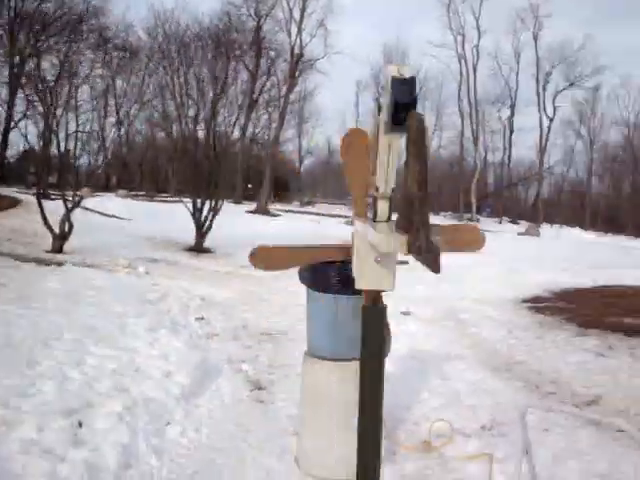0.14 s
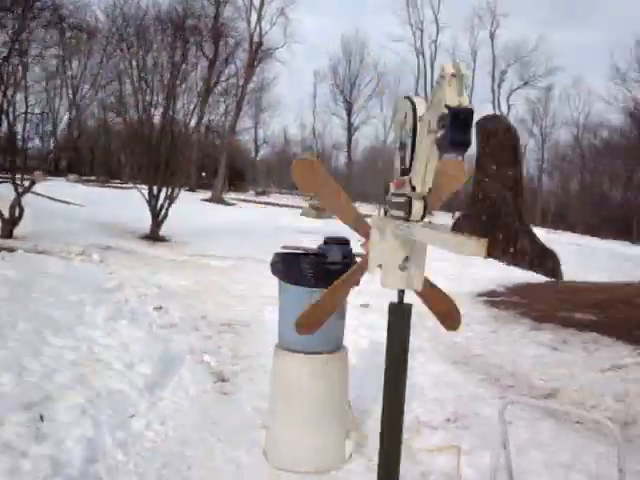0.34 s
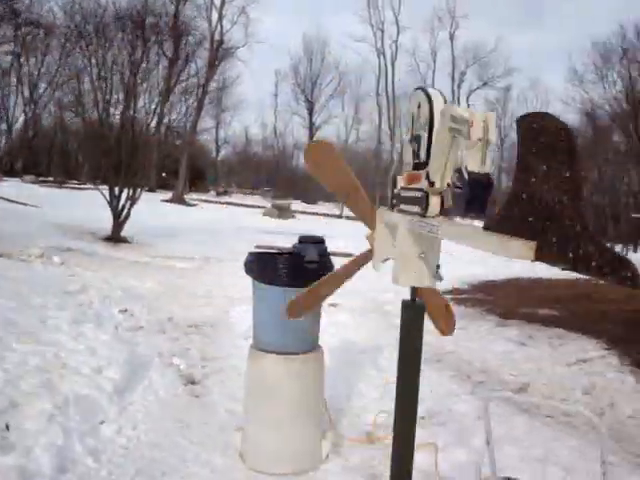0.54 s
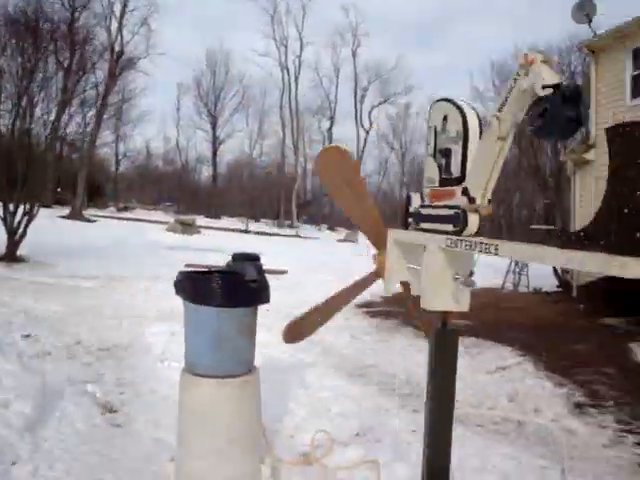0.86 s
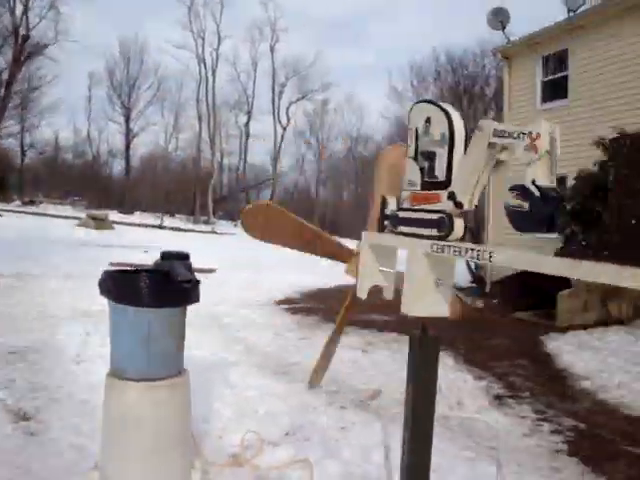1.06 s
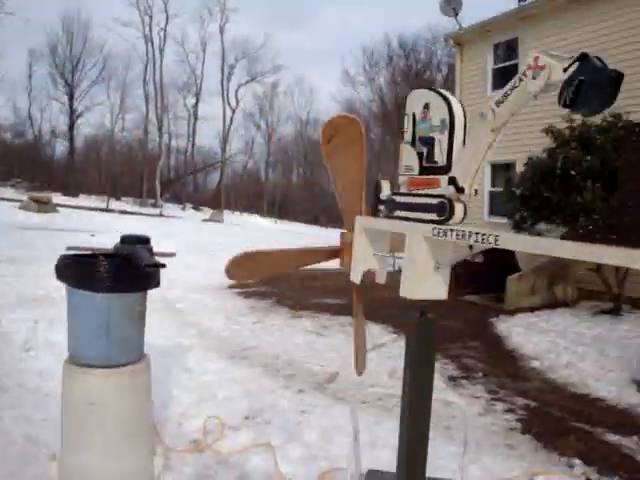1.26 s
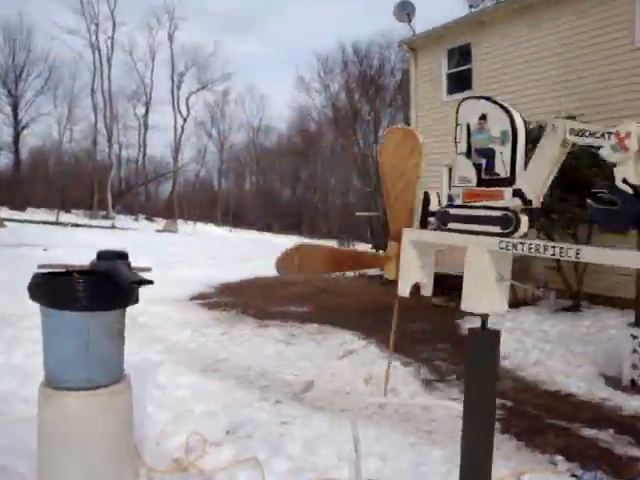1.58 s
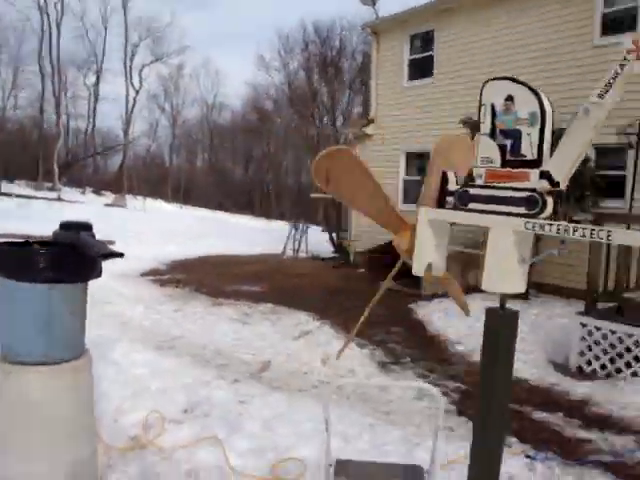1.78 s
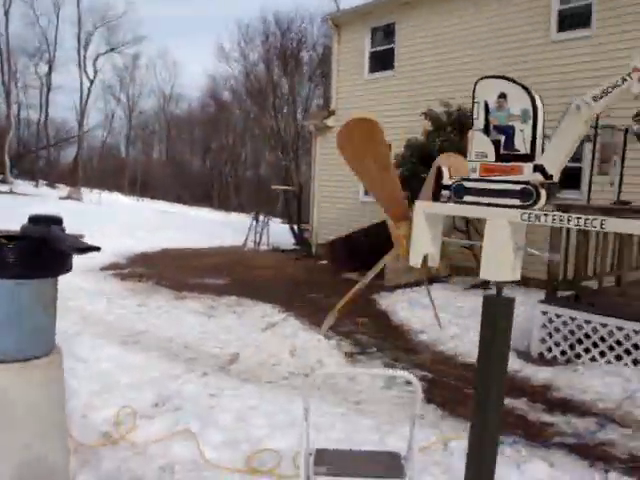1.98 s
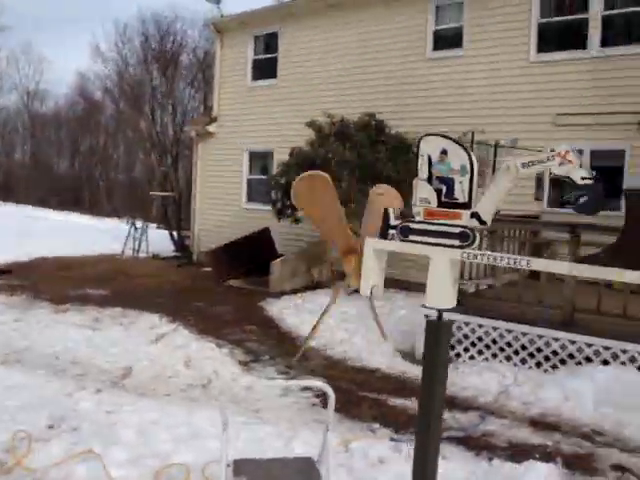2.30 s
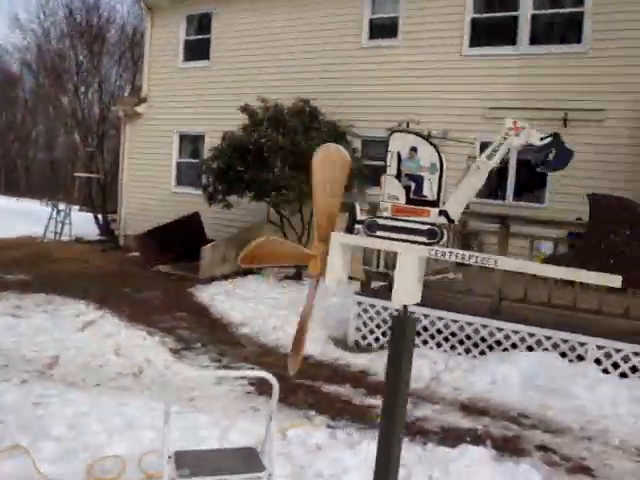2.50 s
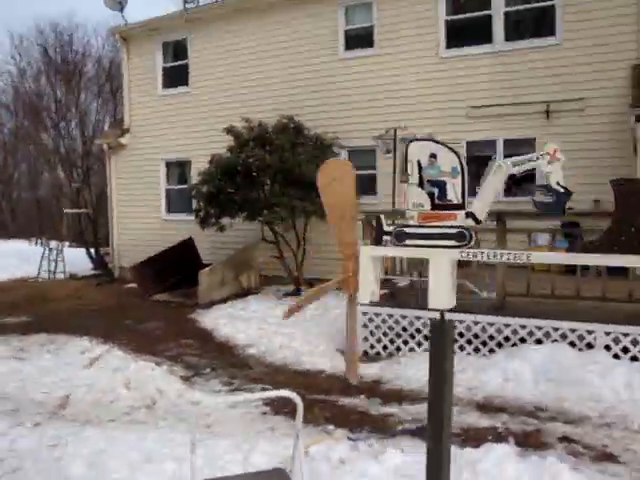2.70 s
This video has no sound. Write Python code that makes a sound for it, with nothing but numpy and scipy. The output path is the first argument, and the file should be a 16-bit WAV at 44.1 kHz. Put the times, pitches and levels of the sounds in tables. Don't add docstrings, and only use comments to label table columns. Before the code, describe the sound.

Steady high blower whine and rushing air outdoors, broken in the first half by harsh wind buffeting

```python
import sys
import numpy as np
from scipy import signal
from scipy.fft import rfft, irfft, next_fast_len
from scipy.io import wavfile
from scipy.ndimage import uniform_filter1d, map_coordinates

SR = 44100
rng = np.random.default_rng(int(sys.argv[2]) if len(sys.argv) > 2 else 0)


def voltage_ratio(decibels):
    exponent = np.asarray(decibels, float) / 20
    return 10 ** exponent


def master_out(mix):
    frames = np.transpose(np.atleast_2d(mix))
    ceiling = np.clip(frames, -1, 1)
    pcm = np.round(ceiling * 32767).astype(np.int16)
    wavfile.write(sys.argv[1], SR, pcm)


N = 125685


def unit(x):
    return x / np.sqrt(np.mean(x ** 2) + 1e-20)


def along(points, hz):
    f, v = np.transpose(points)
    return np.interp(np.log(hz + 1), np.log(f + 1), v)


def curves(rows):
    times, *columns = np.transpose(rows)
    return [np.interp(np.arange(N) / SR, times, column) for column in columns]


def wobble(rate):
    knots = np.minimum(np.arange(N) * rate / SR, 3990)
    return map_coordinates(rng.standard_normal(4000), [knots])


def filtered(x, response):
    m = next_fast_len(N + SR // 2)
    return irfft(rfft(x, m) * response(np.fft.rfftfreq(m, 1 / SR)), m)[..., :N]


def coloured(spectrum, envelope=1):
    noise = envelope * rng.standard_normal(N)
    return unit(filtered(noise, lambda hz: voltage_ratio(along(spectrum, hz))))


# (frequency [Hz], level [dB])
DARK_TURBULENCE = [(30, -51), (80, -29), (150, -7.5), (280, 4.5), (500, 0), (1000, -5), (2500, -52),
                   (6000, -84.5)]
BRIGHT_TURBULENCE = [(60, -29), (200, -11), (500, 2), (900, -1.5), (1600, -8.5), (3000, -23), (6000, -41),
                     (15000, -68.5)]


def turbulence():
    lumps_per_s, lump_db = 300, 4
    dark = coloured(DARK_TURBULENCE, voltage_ratio(lump_db * wobble(lumps_per_s)))
    bright = coloured(BRIGHT_TURBULENCE, voltage_ratio(lump_db * wobble(lumps_per_s)))
    return dark, bright


# (time [s], level [dB])
DRAUGHT_LEVEL = [(0, -41), (.06, -33.5), (.3, -34.5), (.9, -27.5), (1.09, -41), (1.13, -47.5), (1.35, -42),
                 (1.5, -73)]
# (frequency [Hz], level [dB])
RUMBLE_SPECTRUM = [(20, -13.5), (60, -12), (130, 1), (220, -4), (400, -33)]
RUMBLE_DB = -12


def draught(dark):
    level_db = curves(DRAUGHT_LEVEL)[0]
    flow = voltage_ratio(level_db + 1.17 * wobble(35.13)) * dark
    eddies = voltage_ratio(level_db + RUMBLE_DB + 1.7 * wobble(15)) * coloured(RUMBLE_SPECTRUM)
    return flow + eddies


# (time [s], length [s], level [dB], brightness [0-1])
PUFF_EVENTS = [(0.061, 0.036, -31.5, 1), (0.152, 0.019, -26, .2), (.207, 0.041, -21.5, 0.1),
               (.257, 0.016, -11.5, 0.9), (0.275, 0.036, -17, 0.5), (0.315, 0.022, -14.5, 1),
               (.364, .022, -24, 0.3), (0.418, 0.034, -39, 0.4), (0.501, 0.025, -17.5, 1),
               (0.526, 0.011, -27, 0), (0.54, .023, -12.5, 0.9), (0.566, 0.02, -18.5, 0.2),
               (0.593, 0.0035, -19, 0.7), (0.61, .016, -25.5, 0.1), (0.668, .008, -22.5, 0.4),
               (0.683, 0.016, -16.5, 0.8), (0.701, 0.0224, -18.5, 0.3), (0.728, 0.018, -49, 0.1),
               (0.818, 0.0093, -17, 0.6), (0.827, 0.029, -21.5, 0.5), (.858, .008, -11, 0.8),
               (0.885, 0.0047, -11, 0.97), (0.9, 0.024, -40, 0), (0.946, 0.0084, -33, 0.4),
               (0.984, 0.0047, -34, 0.8), (1.029, 0.027, -33, 0), (1.078, 0.02, -29.5, 0),
               (1.224, .013, -23, 0.2), (1.266, .025, -21.5, 0.6), (1.339, 0.0072, -27.5, 0.1)]
EDGE_S = 0.0017


def puffs(dark, bright):
    t, out = np.arange(N) / SR, np.zeros(N)
    for start, length, db, share in PUFF_EVENTS:
        inside = np.minimum(t - start + EDGE_S, start + length + EDGE_S - t)
        gate = np.clip(inside / (2 * EDGE_S), 0, 1) ** 2
        puff = gate * (np.sqrt(1 - share) * dark + np.sqrt(share) * bright)
        to_level = np.sqrt(np.sum(gate ** 2) / (np.sum(puff ** 2) + 1e-20) + 1e-20)
        out = out + voltage_ratio(db) * puff * to_level
    return out


# (time [s], length [s], level [dB])
RUSTLE_EVENTS = [
    (0.325, 0.0099, -31),
    (0.835, 0.016, -33),
    (1.1, 0.036, -38),
]


def grip_rustle():
    t = np.arange(N) / SR
    hiss = coloured([(5500, -32.5), (6500, 6), (10000, -12)])
    return hiss * sum(voltage_ratio(db) * ((t > s) & (t < s + length)) for s, length, db in RUSTLE_EVENTS)


# (time [s], peak level [dB], width [ms], direction [+1 or -1])
SLAPS = [(.2665, -3, .1, -1), (.291, -6, .22, -1), (.331, -6, .12, -1), (.369, -9, .2, -1),
         (.5058, -2, .24, -1), (.5418, -6, .14, -1), (.5475, -5, .07, 1), (.5585, -9, .06, 1),
         (.5607, -3, .13, -1), (.592, -7, .17, -1), (.6862, -4, .08, 1), (.715, -6, .15, -1),
         (.834, -5, .055, -1), (.839, -2, .13, 1), (.8613, -4, .12, 1), (.8865, -2, .09, -1),
         (1.282, -11, .16, 1)]
REBOUND = 3.5
SLAP_LOW_HZ = 170
DIP_S = 0.0014


def membrane_slaps():
    t, out = np.arange(N) / SR, np.zeros(N)
    for s, db, ms, way in SLAPS:
        u = np.abs(t - s) / (ms / 1000)
        dent = (1 + u) * np.exp(-u)
        recoil = (1 + u / REBOUND) * np.exp(-u / REBOUND) / REBOUND
        out = out + way * voltage_ratio(db) * (dent - recoil) * 1.3
    return filtered(out, lambda hz: hz ** 2 / (hz ** 2 + SLAP_LOW_HZ ** 2))


def wind_dips():
    t = np.arange(N) / SR
    return np.prod([1 - np.exp(-((t - s) / DIP_S) ** 2) for s, *_ in SLAPS], axis=0)


TURN_HZ, SHELF_OCTAVES = 3240, 0.77
NEAR_HZ, NEAR_DB = 1280, 4


def rush(spectrum, patchy_db, turn_db):
    hz, t, z = signal.stft(coloured(spectrum), SR, nperseg=512)
    patches = uniform_filter1d(rng.standard_normal(z.shape), 6, 0)
    patches = unit(uniform_filter1d(patches, 10, 1))
    turn = np.interp(t, np.arange(N) / SR, turn_db)
    shelf = np.clip(np.log2((hz + 1) / TURN_HZ), 0, SHELF_OCTAVES)
    cavity = NEAR_DB / 10 * np.exp(-((hz - NEAR_HZ) / 300) ** 2)
    gain_db = patchy_db * patches + (shelf - cavity)[:, None] * turn
    return signal.istft(z * voltage_ratio(gain_db), SR, nperseg=512)[1][:N]


# (frequency [Hz], level per hertz [dB])
ROAR_SPECTRUM = [(35, -66), (60, -43), (278, -22.5), (481, -7), (606, -2.5), (701, -7), (991, 1.5),
                 (1550, -5), (1900, -6), (2470, -30), (4180, -120)]
# (frequency [Hz], level per hertz [dB])
HISS_SPECTRUM = [(1000, -62), (2100, -7.5), (2750, -9), (3400, -14.5), (3900, -13), (4700, -17.5),
                 (6400, -18.5), (10100, -30.5)]
ROAR_DB, HISS_DB = -26, -21
ROAR_FOLLOWS = 0.53


def air_rush(air_db, turn_db):
    roar = voltage_ratio(ROAR_DB + ROAR_FOLLOWS * air_db) * rush(ROAR_SPECTRUM, 0.89, turn_db)
    hiss = voltage_ratio(HISS_DB + air_db + 0.36 * wobble(5.17)) * rush(HISS_SPECTRUM, 0.84, turn_db)
    return roar + hiss


BLADES = 35
# (time [s], blade-passing frequency [Hz])
BLADE_PITCH = [(0, 2107.8), (.25, 2109.2), (.8, 2110.4), (1.5, 2110), (1.85, 2109.2), (2.05, 2108),
               (2.35, 2107.3), (2.58, 2110.2), (2.85, 2108.8)]
# (blade multiple, level re whine [dB], flutter [dB])
BLADE_HARMONICS = [(1, 0, .35), (2, -17.5, 1.3), (3, -22, 2), (4, -38, 3)]
# (offset from the multiple [shaft orders], blade multiple, level re whine [dB])
SHAFT_SIDEBANDS = [(-1, 1, -23), (1, 1, -22.5), (-1, 3, -35), (1, 3, -34), (-7, 1, -29)]
# (shaft order, level re whine [dB])
SHAFT_ORDERS = [(3, -50.5), (5, -43.5), (6, -50), (7, -37), (8, -32), (10, -31.5)]


def whine(level_db, turn_db):
    pitch = curves(BLADE_PITCH)[0] + 0.4 * wobble(6)
    shaft_angle = 2 * np.pi * np.cumsum(pitch) / SR / BLADES

    def tone(order, db, flutter):
        phase = rng.uniform(0, 2 * np.pi)
        return voltage_ratio(db + flutter * wobble(28.02)) * np.sin(order * shaft_angle + phase)

    lines = np.zeros(N)
    for k, db, flutter in BLADE_HARMONICS:
        lines += tone(k * BLADES, db + 0.6 * (k > 2) * turn_db, flutter)
    for offset, k, db in SHAFT_SIDEBANDS:
        lines += tone(k * BLADES + offset, db, 2.2)
    for order, db in SHAFT_ORDERS:
        lines += tone(order, db, 3.1)
    return np.sqrt(2) * voltage_ratio(level_db) * lines


# (time [s], whine level [dB], air rush gain [dB], treble turn [dB])
WALK_ROUND = [(0, -17, -1.5, -7), (.2, -20, -1, -12), (.262, -21.5, -10.5, -1.5),
              (.272, -27.5, -10.5, -14.5), (.45, -25.5, -10, -5), (.56, -31, -14.5, -1.5),
              (.68, -30, -11.5, -4.5), (.76, -26.5, -13.5, -2.5), (.89, -27.5, -8.5, -5),
              (.97, -23, -8.5, -0.5), (1.1, -23.5, -4, 0), (1.31, -18.5, -3, 1.5), (1.55, -18.5, -1, 0.5),
              (1.85, -17, -1, -2), (2.3, -16.5, -2, -1), (2.6, -15.5, -2, 0), (2.85, -17.5, -2.5, 1.5)]


def blower():
    level_db, air_db, turn_db = curves(WALK_ROUND)
    return whine(level_db, turn_db) + air_rush(air_db, turn_db)


def scene():
    dark, bright = turbulence()
    wind = draught(dark) + puffs(dark, bright)
    return (wind_dips() * wind + grip_rustle() + membrane_slaps() + blower())[None]


TOP_HZ = 10010
HOLE_HZ, HOLE_SHARE, HOLE_LOAD = 4500, 0.03, 2.5


def treble_holes(x):
    hz, t, z = signal.stft(x, SR, nperseg=512)
    load = np.sqrt(np.sum(np.abs(z[0, 2:10]) ** 2, 0))
    cells = rng.random((len(hz) // 5 + 1, len(t) // 2 + 1))
    cells = cells.repeat(5, 0).repeat(2, 1)[:len(hz), :len(t)]
    treble = (hz[:, None] / TOP_HZ) ** 2 * (hz[:, None] > HOLE_HZ)
    odds = (HOLE_SHARE + HOLE_LOAD * uniform_filter1d(load, 5)) * treble
    return signal.istft(z * (cells > odds), SR, nperseg=512)[1][:, :N]


def band_limit(x):
    return signal.sosfilt(signal.butter(12, 10240, fs=SR, output="sos"), x)


LOW_HZ, SKIRT_DB_PER_HZ = 18, 0.2
CLIP_AT, CLIP_HARD = 0.71, 12


def record(dry):
    x = filtered(dry, lambda hz: (1j * hz / (LOW_HZ + 1j * hz)) ** 2)
    x = x / (1 + np.abs(x / CLIP_AT) ** CLIP_HARD) ** (1 / CLIP_HARD)
    x = filtered(x, lambda hz: voltage_ratio(-SKIRT_DB_PER_HZ * np.clip(hz - TOP_HZ, 0, 600)))
    return band_limit(treble_holes(x))


dry = scene()
out = record(dry)
master_out(out)
```